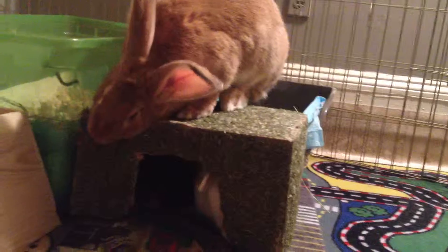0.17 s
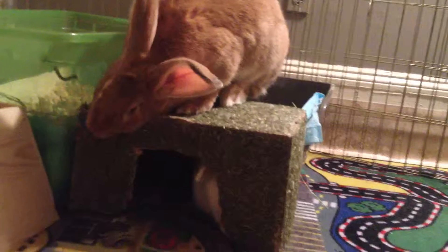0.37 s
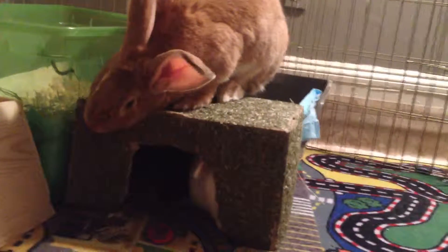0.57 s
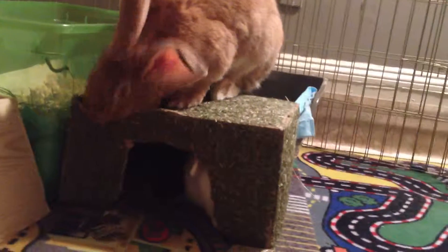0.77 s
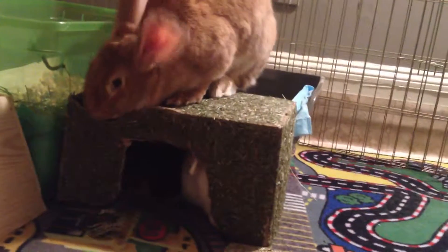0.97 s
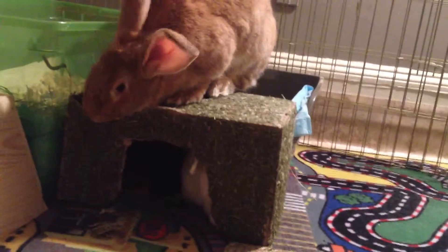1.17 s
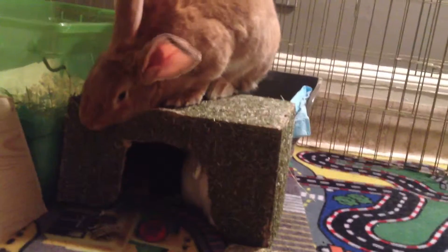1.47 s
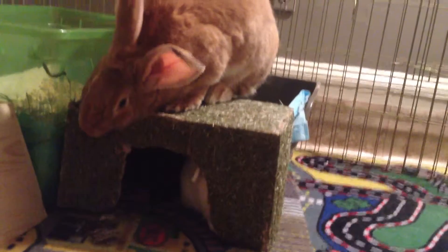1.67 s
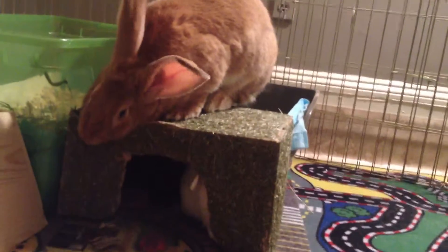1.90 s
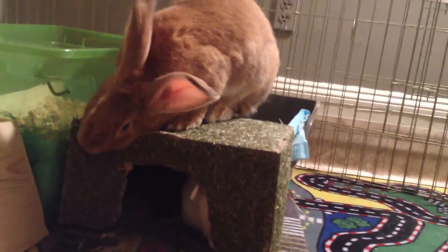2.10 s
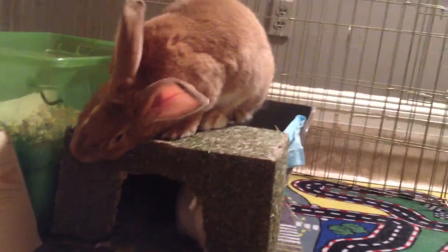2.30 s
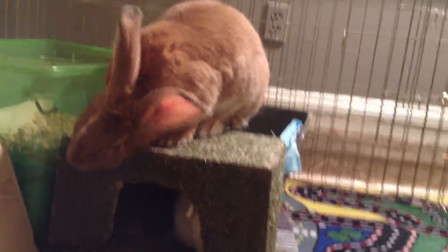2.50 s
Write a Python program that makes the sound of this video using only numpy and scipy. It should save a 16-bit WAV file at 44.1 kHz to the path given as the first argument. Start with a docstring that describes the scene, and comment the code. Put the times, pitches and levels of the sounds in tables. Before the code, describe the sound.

Rabbit chewing on a dry grass hut, stalks snapping and crackling over dull little thumps.

```python
"""Rabbit gnawing a grass hut

A small room, one microphone about a metre from a rabbit on top of a hollow hut of pressed dry grass.
Each tug of its teeth at the edge knocks the hut; dry stalks snap, fibres crackle as they tear,
and once the grass rustles in a longer swish. The room rings briefly over a faint hiss."""
import sys
import numpy as np
from scipy import signal
from scipy.fft import rfft, irfft
from scipy.io import wavfile

SR = 44100
rng = np.random.default_rng(int(sys.argv[2]) if len(sys.argv) > 2 else 0)


def bounce(signal):
    """Save signal as a 16-bit WAV file at the path given by the first command-line argument."""
    frames = np.transpose(np.atleast_2d(signal))
    limited = np.clip(frames, -1, 1)
    pcm = np.round(limited * 32767).astype(np.int16)
    wavfile.write(sys.argv[1], SR, pcm)


N = 116865
ROOM_T60_S = 0.32


def undb(db):
    """Decibels to gain."""
    return 10 ** (np.asarray(db) / 20)


def unit(x):
    """Scale to rms 1."""
    return x / np.sqrt(np.mean(x ** 2) + 1e-20)


def fade(t, t60):
    """Exponential decay, 60 dB down at t60."""
    return np.exp(-np.log(1000) * t / max(t60, 1e-4))


def swell(t, rise_s, t60):
    """A rounded attack into an exponential decay."""
    return (1 - np.exp(-t / rise_s)) * fade(t, t60)


def db_at(hz, points):
    """Read (f/Hz, level/dB) points on a log-frequency axis."""
    f, db = np.array(points, float).T
    return np.interp(np.log(hz + 1), np.log(f), db)


def colour(x, points, size=2048):
    """Minimum-phase filter with the given (f/Hz, gain/dB) response."""
    gain = undb(db_at(np.fft.rfftfreq(size, 1 / SR), points))
    cepstrum = irfft(np.log(gain))
    cepstrum[1:size // 2] *= 2
    cepstrum[size // 2 + 1:] = 0
    impulse = irfft(np.exp(rfft(cepstrum)))
    return signal.oaconvolve(x, impulse)[:len(x)]


def noise(points):
    """Coloured noise of rms 1."""
    return unit(colour(rng.standard_normal(N), points))


def grains(per_s, spread_db, ceiling=2 * np.pi):
    """Random tiny clicks, a few larger than the rest."""
    size = undb(spread_db * np.minimum(rng.exponential(size=N), ceiling))
    return (rng.random(N) < per_s / SR) * size * rng.choice([-1, 1], N)


def add(out, at_s, x):
    """Mix a sound in at a time."""
    i = max(int(at_s * SR), 0)
    out[i:i + len(x)] += x[:max(N - i, 0)]


# Spectrum of the quiet room at the microphone: f/Hz, level/dB
HISS_SPECTRUM = [(30, -18.5), (70, -42), (115, -2.5), (160, -8), (200, -6), (245, 6), (300, -11.5),
                 (480, -5.5), (750, -13.5), (1000, -14), (1500, -19.5), (2200, -22), (4000, -22.5),
                 (8000, -26.5), (15000, -26.5)]


def room_tone():
    """A faint steady hiss, strongest in the lows."""
    return undb(-65.5) * noise(HISS_SPECTRUM)


def room(x, gap_s=0.0017, tail_db=-5):
    """The direct sound reaches the microphone first, then a short diffuse tail from the walls."""
    t = np.arange(SR // 2) / SR
    tail = rng.standard_normal(len(t)) * fade(t, ROOM_T60_S) * (t > gap_s)
    tail = colour(tail / np.linalg.norm(tail), [(2000, -1.5), (8000, 4), (15000, -26)])
    return x + undb(tail_db) * signal.fftconvolve(x, tail)[:N]


# Rise and fall of the one long rustle: t/s, level/dB
SWISH_ENVELOPE = [(.67, -85), (0.686, -54), (0.714, -45), (0.732, -42), (.757, -49), (0.794, -48),
                  (.825, -58.5), (0.863, -65)]
# Spectrum of grass rubbing on the hut: f/Hz, level/dB
SWISH_SPECTRUM = [(40, -39), (110, 14.5), (240, 23.5), (500, 13.5), (800, 3.5), (990, 16), (1200, 0.5),
                  (4000, 1.5), (10000, -2.5), (16000, -6)]


def grass_swish():
    """Dry grass rubs on the hut in a dense run of grains, with coarser crunches where it catches."""
    at, db = np.array(SWISH_ENVELOPE).T
    gain = undb(np.interp(np.arange(N) / SR, at, db, left=-np.inf, right=-np.inf))
    rub = unit(grains(per_s=12000, spread_db=2))
    crunch = undb(-2) * unit(grains(per_s=400, spread_db=3, ceiling=1.1))
    return gain * unit(colour(rub + crunch, SWISH_SPECTRUM))


def fibre_ticks(centre_hz=10300, spread_oct=0.21, top_hz=15300, ring_cycles=26):
    """Single dry fibres pop, each ringing briefly at its own high pitch."""
    out, t = np.zeros(N), np.arange(SR // 100) / SR
    pops = grains(per_s=380, spread_db=4.5, ceiling=np.pi)
    hz = np.minimum(centre_hz * 2 ** (spread_oct * rng.standard_normal(N)), top_hz)
    for i in np.flatnonzero(pops):
        add(out, i / SR, pops[i] * np.sin(2 * np.pi * hz[i] * t) * fade(t, ring_cycles / hz[i]))
    return unit(out)


# Spells of tearing: t/s, length/s, level/dB, woody lift up to 2.4 kHz/dB
TEAR_SPELLS = [(0.03, 0.069, -61.5, 9), (0.089, 0.039, -53, 18), (0.119, 0.15, -65, 7),
               (0.373, 0.063, -57, 8), (0.624, 0.044, -65, 1.5), (0.825, 0.26, -70, 18),
               (1.186, 0.24, -76, -2), (1.409, 0.26, -69.5, 7.5), (1.671, 0.17, -64, 4),
               (1.795, 0.22, -63, 3.5), (1.855, 0.11, -70, 20), (1.994, 0.18, -62, 4.5),
               (2.264, 0.085, -67, 6.5), (2.49, 0.031, -65.5, 15), (2.613, 0.1, -67, 9)]
# Spectrum of the fine crackle: f/Hz, level/dB
CRACKLE_SPECTRUM = [(200, -1), (1000, 5), (1500, -6), (2150, 0.5), (3000, -7), (5000, -3), (7500, -3),
                    (11000, -3.5), (16000, -8.5)]


def tearing_fibres():
    """Fibres tear in spells of crackle that swell and fade; thicker fibres sound woodier."""
    out = np.zeros(N)
    crackle = unit(colour(grains(per_s=4600, spread_db=3), CRACKLE_SPECTRUM))
    fibres = crackle + undb(-2.5) * fibre_ticks()
    for at, length, db, woody_db in TEAR_SPELLS:
        spell = fibres[int(at * SR):][:int(length * SR)]
        spell = unit(colour(spell, [(2400, woody_db), (5000, 0.0081)], size=256))
        add(out, at, undb(db) * signal.windows.tukey(len(spell), .5) * spell)
    return out


# Stalks breaking at the hut's edge: t/s, level/dB, peak f/Hz, woody body/dB
STALK_BREAKS = [(0.053, -46.5, 4970, -1), (0.167, -59, 10800, -6), (0.175, -54, 10200, -1),
                (0.2095, -50, 7400, -1), (0.2453, -31.5, 8000, -3), (.363, -51.5, 7740, -1.5),
                (0.389, -41.5, 8600, 0), (.393, -47, 6200, 0), (0.4025, -37, 6500, 5),
                (.640, -59.5, 8100, 6), (0.792, -48.5, 6000, -5), (0.814, -45.5, 5340, -8),
                (.9430, -47.5, 11500, -9.5), (1.2074, -53, 13800, -6.5), (1.4055, -44.5, 9100, -8.5),
                (1.468, -56, 2200, 0.5), (1.498, -58.5, 7500, 3.5), (1.579, -52, 7900, 0.5),
                (1.670, -64.5, 8150, 9.5), (1.7058, -54.5, 10200, -17), (1.7445, -53.5, 10600, 2),
                (1.777, -48.5, 9500, -1), (1.8654, -39, 1620, -14.5), (2.0273, -43.5, 7100, -16),
                (2.046, -46.5, 2220, -14), (2.110, -51, 11000, -8), (2.1276, -39.5, 7900, -4.5),
                (2.188, -54, 7460, -23), (2.2684, -36.5, 5150, -11), (2.269, -40.5, 10100, -20),
                (2.350, -53, 2110, -18), (2.474, -45, 6700, -14), (2.481, -48, 7200, -10),
                (2.503, -42, 7200, -11.5), (2.518, -49, 7000, -7), (2.599, -52, 6700, -5)]
# Spectrum of a stalk's woody body: f/Hz, level/dB
STALK_SPECTRUM = [(200, -5), (700, 6.5), (1000, -3), (1450, -2), (2100, 2.5), (2800, -2), (5000, -4),
                  (10000, -14), (16000, -8)]


def snapping_stalks(width_oct=0.33, lift_db=1.5):
    """A stalk breaks in a spiky burst peaked at its own pitch, splinters and echoes in the room."""
    out, t = np.zeros(N), np.arange(SR // 5) / SR
    crack_shape = undb(8) * swell(t, rise_s=0.00063, t60=0.0094)
    splinter_shape = undb(-6) * fade(t, t60=0.041)
    room_shape = undb(-17.5) * fade(t, ROOM_T60_S)
    f = np.geomspace(100, 16000, 90)
    for at, db, hz, body_db in STALK_BREAKS:
        peak = (1 + (np.log2(f / hz) / width_oct / 2) ** 2) ** -2
        body = undb(body_db + db_at(f, STALK_SPECTRUM))
        spectrum = np.c_[f, 20 * np.log10(np.hypot(peak, body))]
        crack = unit(rng.laplace(size=len(t))) * crack_shape
        tail = rng.standard_normal(len(t)) * (splinter_shape + room_shape)
        add(out, at, undb(db + lift_db) * colour(crack + tail, spectrum, size=512))
    return out


def bite_thud(t, hz, start_ratio=1.295, end_ratio=0.562, glide_s=0.00906, rise_s=0.0045):
    """The bitten spot thuds with a falling pitch, as bending waves bring the highs first."""
    pitch = hz * (end_ratio + (start_ratio - end_ratio) * np.exp(-t / glide_s))
    phase = 2 * np.pi * np.cumsum(pitch) / SR
    push = undb(18.5) * (1 - np.exp(-t / rise_s)) ** 2 * fade(t, t60=0.023)
    second_mode = undb(-20) * np.sin(2.15 * phase)
    return push * (np.sin(phase) + second_mode)


# Tugs of the teeth, a metre off: t/s, level/dB, nominal f of the spot/Hz, bass/dB, brightness/dB
TOOTH_TUGS = [(0.046, -35, 469, 0.5, 2), (0.064, -35, 233, 0, -5), (.106, -43.5, 443, -8.5, 9.5),
              (0.166, -46.5, 480, 0, 1), (0.189, -48, 250, 7, -3), (0.209, -40.5, 524, -10, -10),
              (0.2445, -24, 444, -7.5, -1.5), (0.376, -40, 572, -8, 3), (.387, -38, 610, -4, 9),
              (0.402, -29.5, 472, -1, 7), (0.42, -57, 207, 14, 0), (0.5192, -30, 479, 1, -7),
              (0.633, -48, 484, 8, 3.5), (.789, -43, 322, -16, -25), (1.449, -36, 326, -5.5, -7),
              (1.493, -45.5, 334, 3.5, -0.5), (1.578, -37.5, 483, 0.5, -3.5), (1.671, -52, 500, 7.5, 5),
              (1.715, -49, 447, 4, 1), (1.731, -39.5, 250, -2.5, 2), (1.744, -42, 573, 0, -5),
              (1.774, -42, 334, -3, 0.5), (1.8655, -29.5, 380, -2.5, -15), (2.044, -43, 669, -8, 1),
              (2.049, -38.5, 302, -3, -6), (2.07, -44, 455, -21, 2), (2.127, -39.5, 312, 1.5, -7),
              (2.1392, -36.5, 498, -2.5, 6.5), (2.268, -46.5, 593, -5, 3.5), (2.281, -43, 334, 5.5, 5),
              (2.348, -41.5, 515, 2.5, -3.5), (2.363, -63.5, 370, 21.5, -9), (2.477, -49, 318, -6, 5.5),
              (2.5156, -49, 606, -1.5, 13), (2.587, -46, 400, 2, -4)]
# Modes of the hollow hut: f/Hz, level/dB, t60/s
HUT_MODES = [(113.3, -23, 0.31), (161.5, -15, 0.21), (241.8, -10, 0.24), (292.2, 2, 0.035),
             (336, -13.5, 0.18), (387, -13, 0.064), (445.5, -13, 0.29), (511.5, -11.5, 0.13),
             (629, -15, 0.19), (985, -10.5, 0.053), (1047, -10.5, 0.045)]
# Diffuse ring of hut and room after a tug: f/Hz, level/dB
BOOM_SPECTRUM = [(30, -48), (70, -24), (110, -17.5), (240, 6), (480, -3.5), (640, -10), (800, -19),
                 (1000, -17.5), (1350, -23), (2200, -35), (4000, -32), (16000, -103)]
# Bass that reaches the microphone late: f/Hz, level/dB
LATE_BASS_SPECTRUM = [(40, -54), (80, -23.5), (115, -6.5), (165, -3), (250, 2.5), (400, -18), (1000, -63),
                      (16000, -104)]


def tugging_teeth(mode_rise_cycles=2.9, scatter_db=2, wall_lag_s=0.0135):
    """Each tug thuds, echoes off the nearest wall, rings the hut and leaves a boom; the lows come late."""
    out, t = np.zeros(N), np.arange(SR // 3) / SR
    modes = np.array([undb(db + 0.74) * np.exp(2j * np.pi * hz * t) * swell(t, mode_rise_cycles / hz, t60)
                      for hz, db, t60 in HUT_MODES])
    boom, boom_shape = noise(BOOM_SPECTRUM), undb(-11) * swell(t, rise_s=0.002, t60=0.31)
    bass, bass_shape = noise(LATE_BASS_SPECTRUM), undb(-5) * swell(t, rise_s=0.021, t60=0.19)
    for at, db, hz, bass_db, bright_db in TOOTH_TUGS:
        stretch = rng.integers(N - len(t)) + np.arange(len(t))
        diffuse = boom_shape * boom[stretch] + bass_shape * bass[stretch]
        strength, phase = rng.standard_normal((2, len(HUT_MODES)))  # each tug has its own mix of modes
        mode_mix = undb(scatter_db * strength) * np.exp(.5j * phase)
        ring = (mode_mix @ modes).imag
        thud = bite_thud(t, hz)
        lag_s = wall_lag_s * (1 + rng.standard_normal() / 10)
        echo = undb(-8.5) * np.interp(t - lag_s, t, thud)
        tone = [(170, bass_db), (300, 0), (550, 0.0086), (1000, bright_db)]
        add(out, at, undb(db) * colour(thud + echo + ring + diffuse, tone, size=512))
    return out


def scene():
    """At the microphone, in mono: the gnawing, cut below 82 Hz, over the quiet of the room."""
    gnawing = tugging_teeth() + snapping_stalks() + room(tearing_fibres()) + grass_swish()
    low_cut = signal.butter(2, 82, "high", fs=SR, output="sos")
    return (signal.sosfilt(low_cut, gnawing) + room_tone())[None]


def record(dry, start_s=0.035, top_hz=15300):
    """The sound opens after an instant of silence; the top is cut steeply."""
    opened = dry * (np.arange(N) / SR > start_s)
    high_cut = signal.ellip(10, .2, 60, top_hz, fs=SR, output="sos")
    return signal.sosfilt(high_cut, opened)


dry = scene()
out = record(dry)
bounce(out)
```